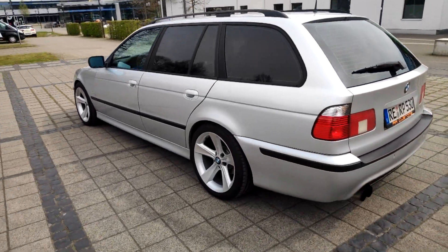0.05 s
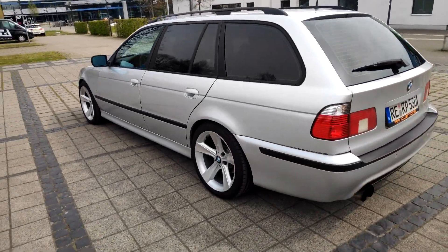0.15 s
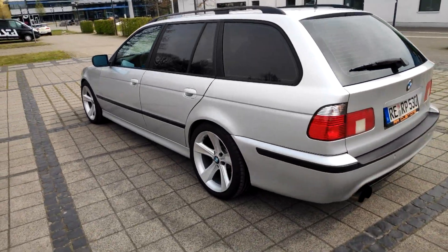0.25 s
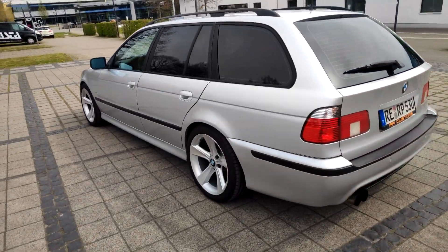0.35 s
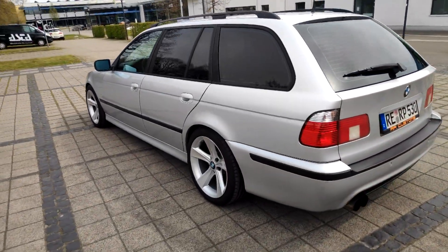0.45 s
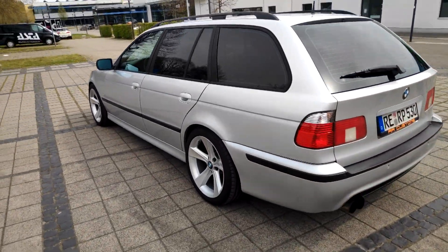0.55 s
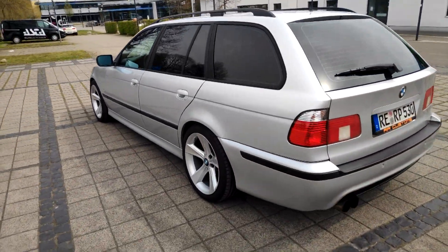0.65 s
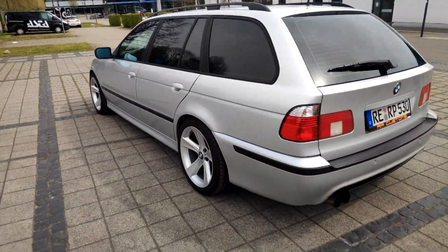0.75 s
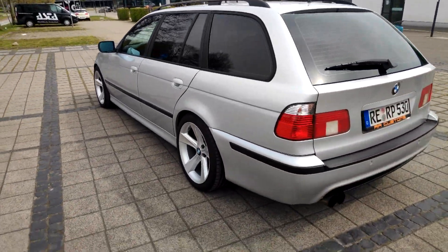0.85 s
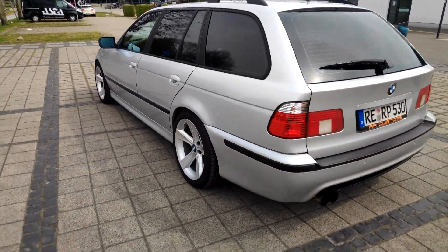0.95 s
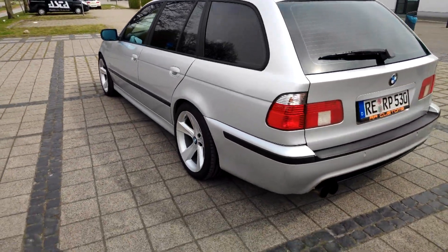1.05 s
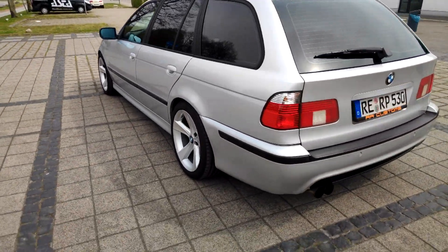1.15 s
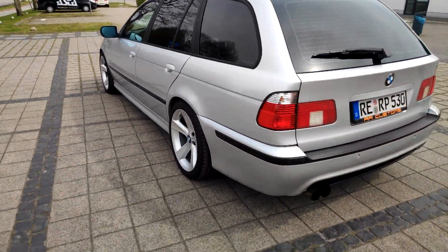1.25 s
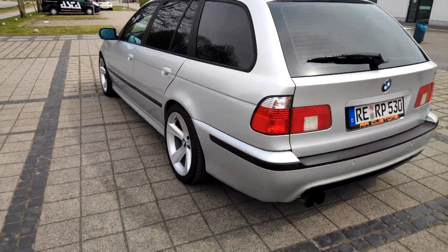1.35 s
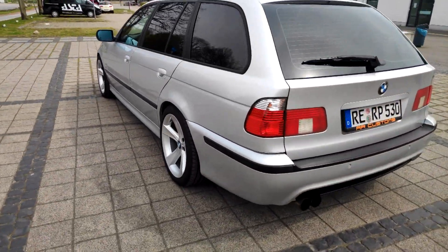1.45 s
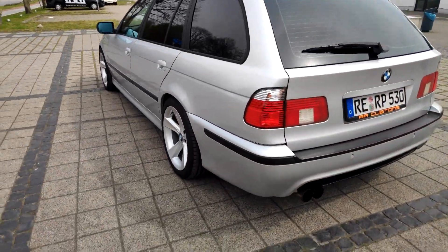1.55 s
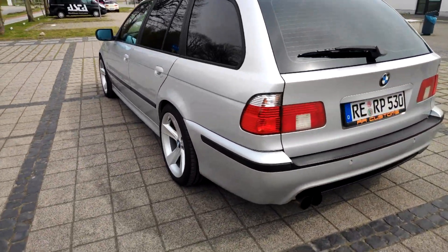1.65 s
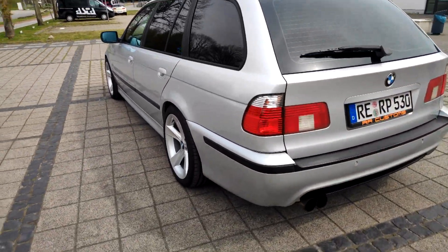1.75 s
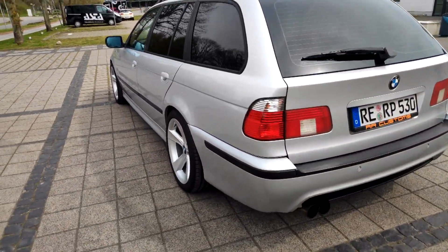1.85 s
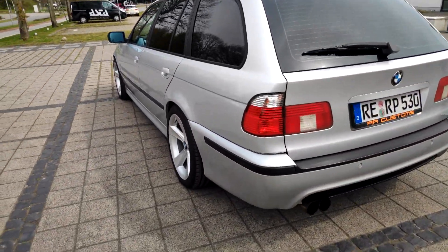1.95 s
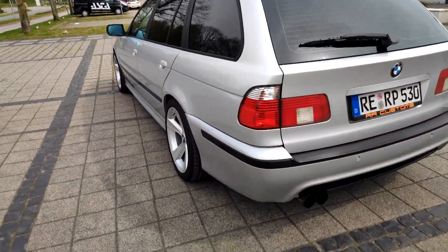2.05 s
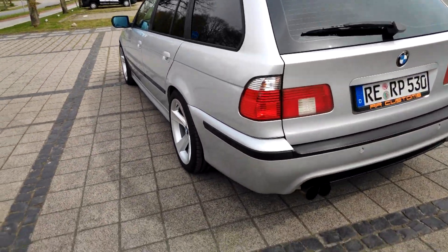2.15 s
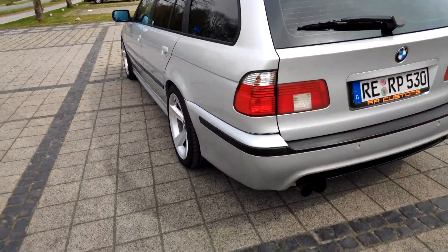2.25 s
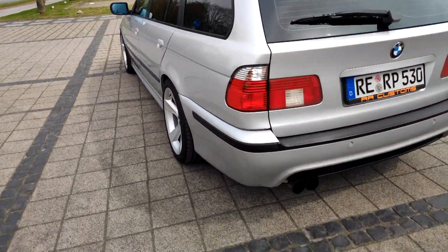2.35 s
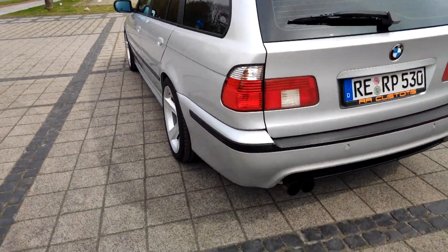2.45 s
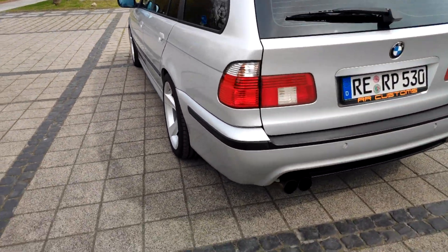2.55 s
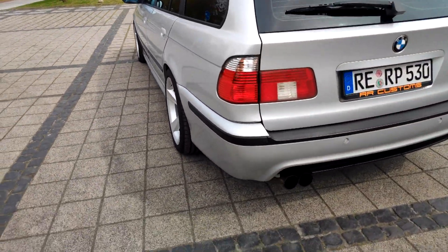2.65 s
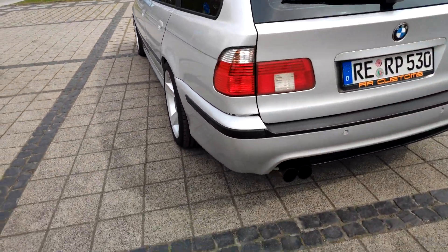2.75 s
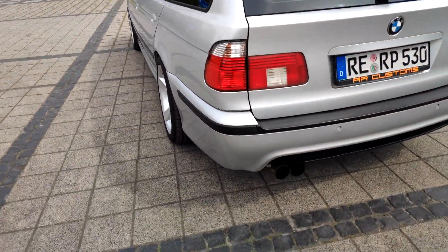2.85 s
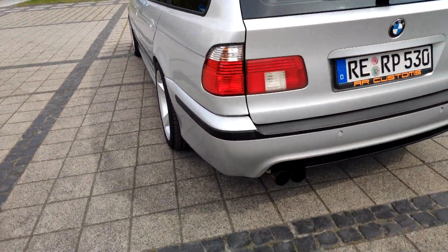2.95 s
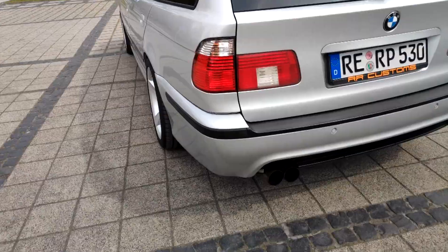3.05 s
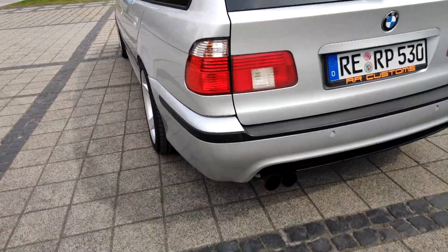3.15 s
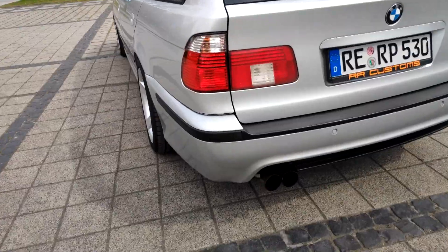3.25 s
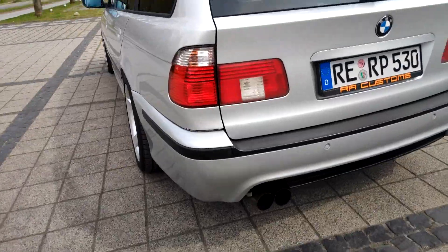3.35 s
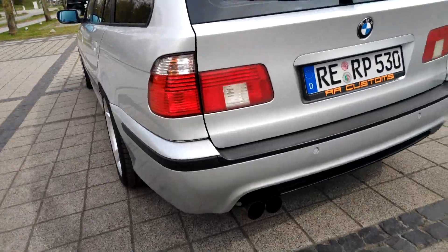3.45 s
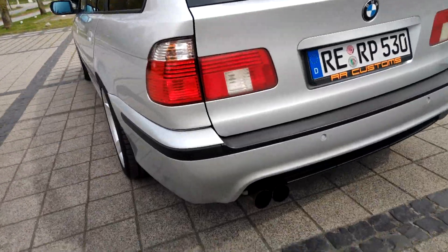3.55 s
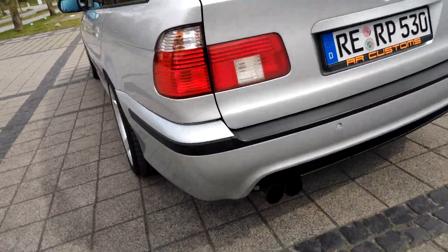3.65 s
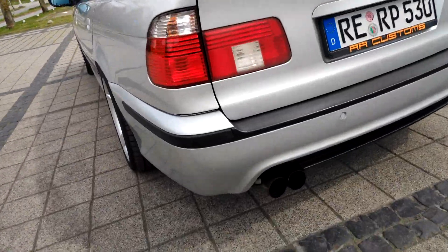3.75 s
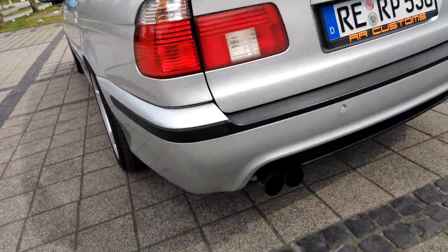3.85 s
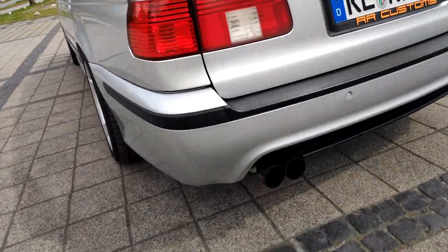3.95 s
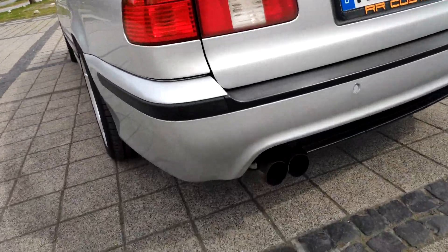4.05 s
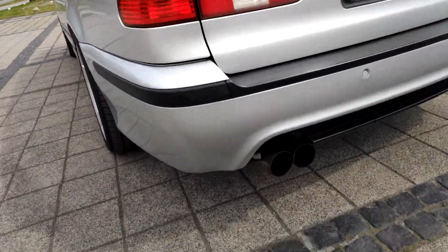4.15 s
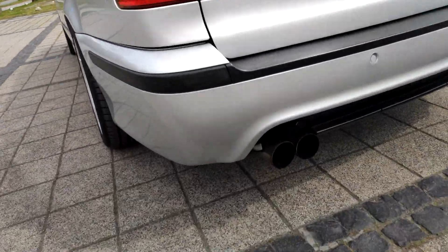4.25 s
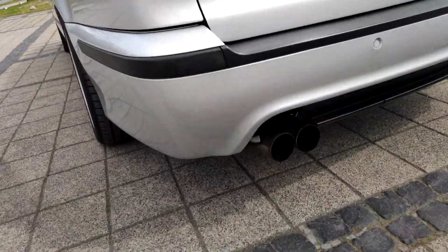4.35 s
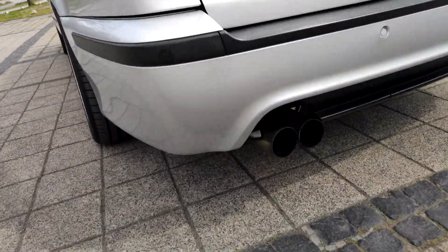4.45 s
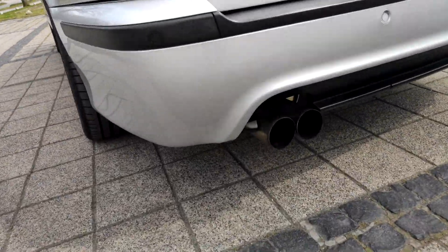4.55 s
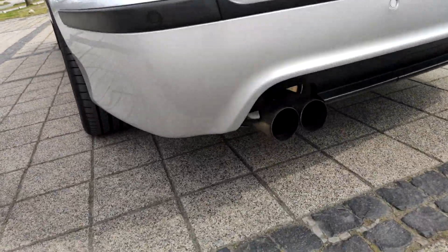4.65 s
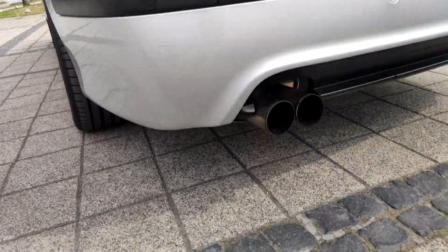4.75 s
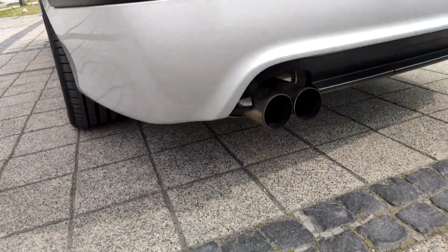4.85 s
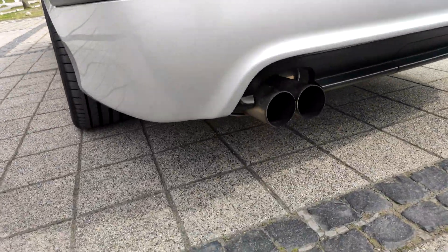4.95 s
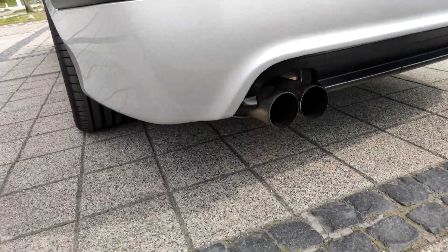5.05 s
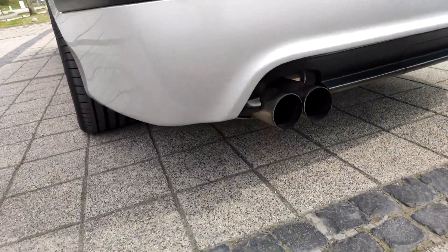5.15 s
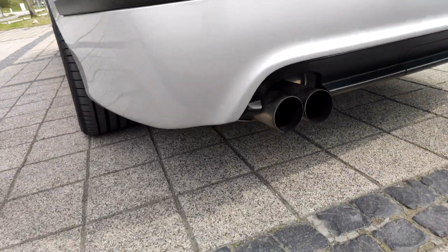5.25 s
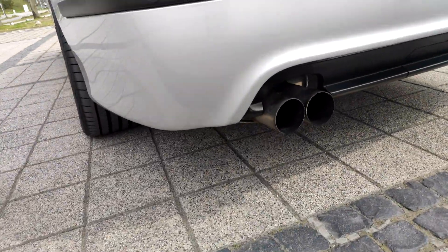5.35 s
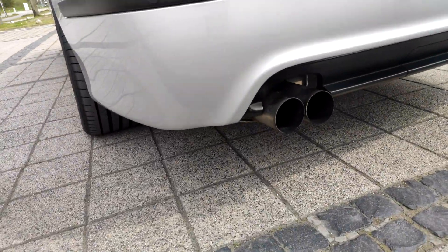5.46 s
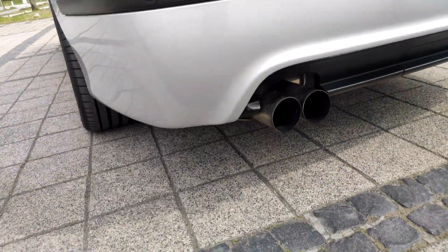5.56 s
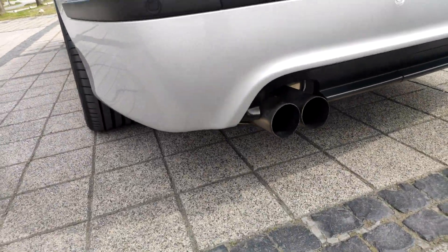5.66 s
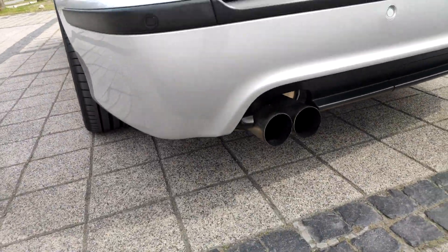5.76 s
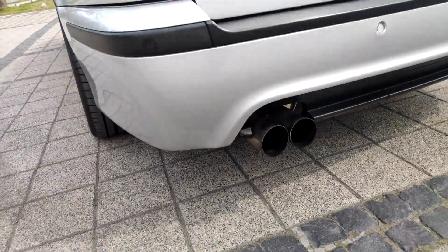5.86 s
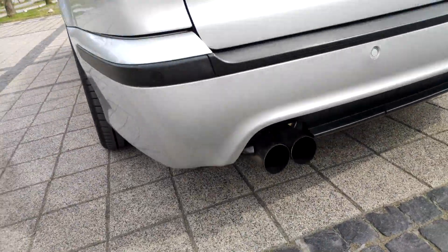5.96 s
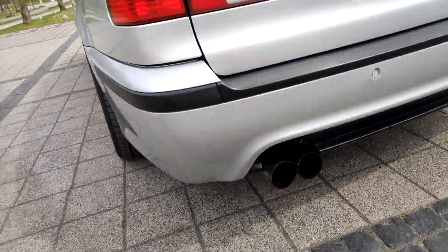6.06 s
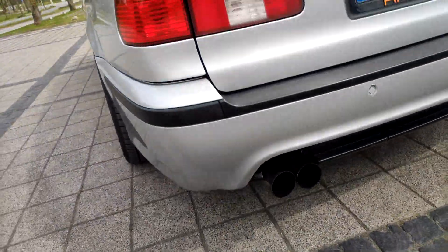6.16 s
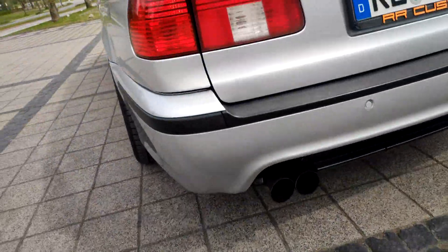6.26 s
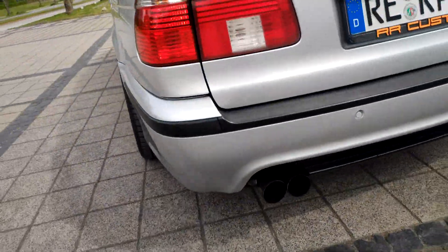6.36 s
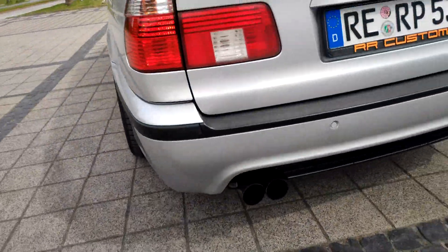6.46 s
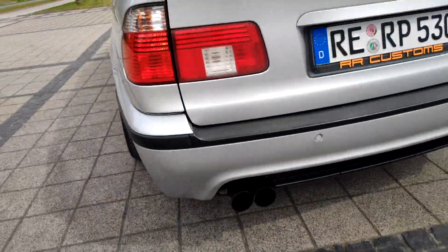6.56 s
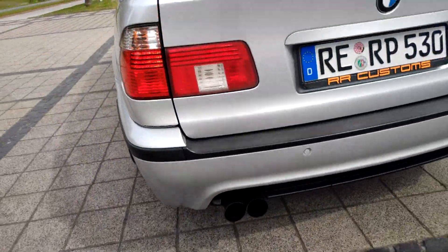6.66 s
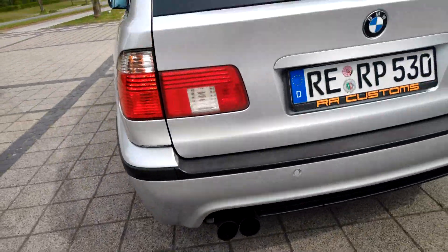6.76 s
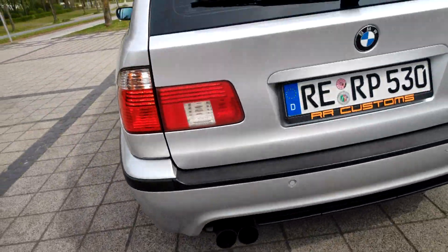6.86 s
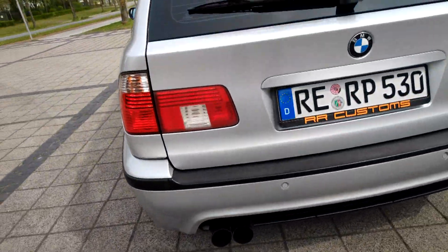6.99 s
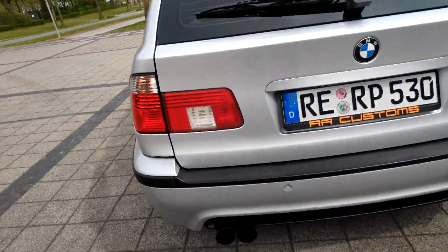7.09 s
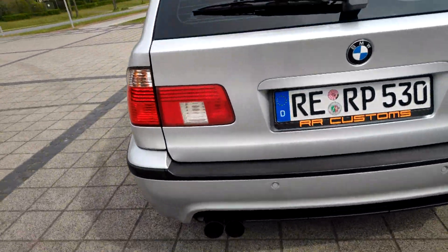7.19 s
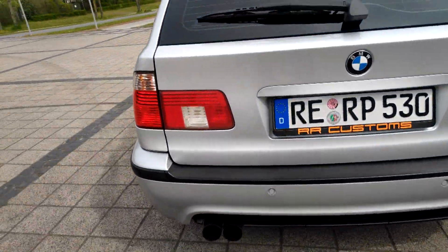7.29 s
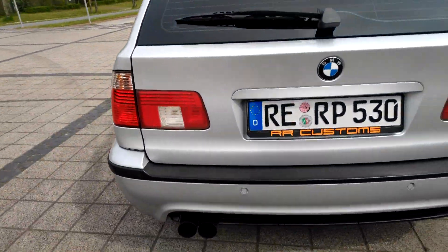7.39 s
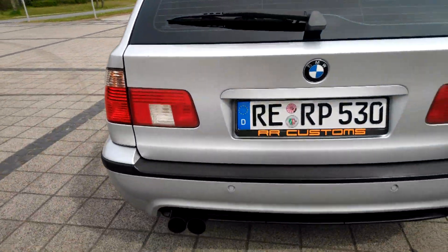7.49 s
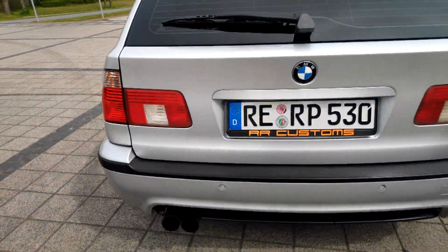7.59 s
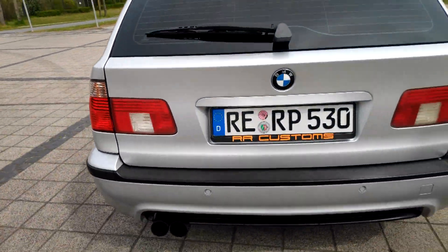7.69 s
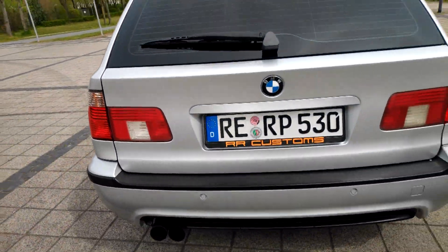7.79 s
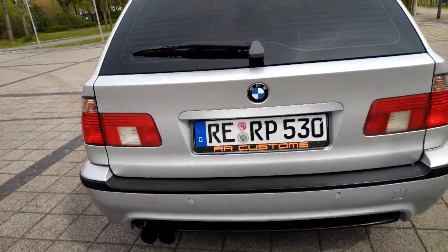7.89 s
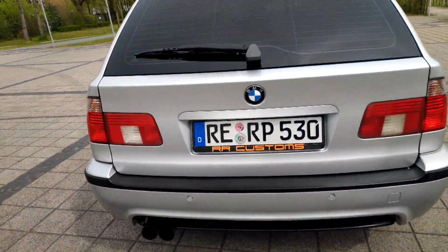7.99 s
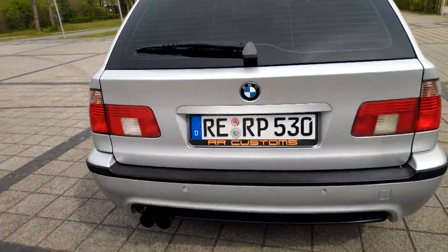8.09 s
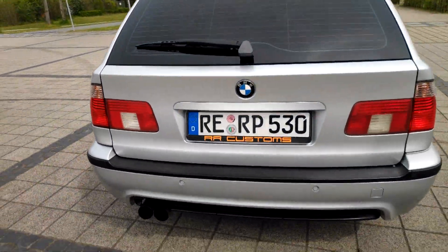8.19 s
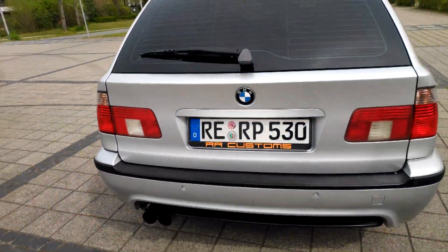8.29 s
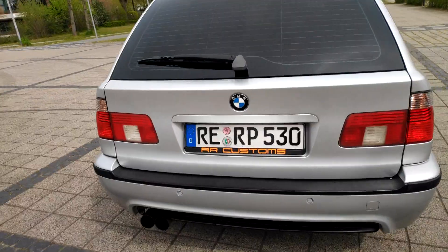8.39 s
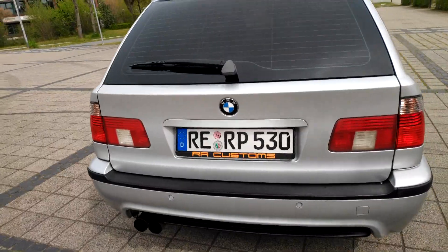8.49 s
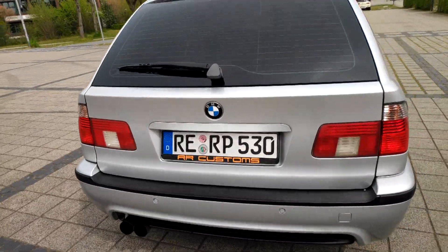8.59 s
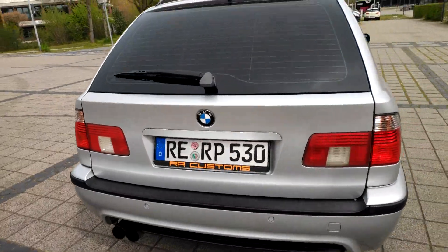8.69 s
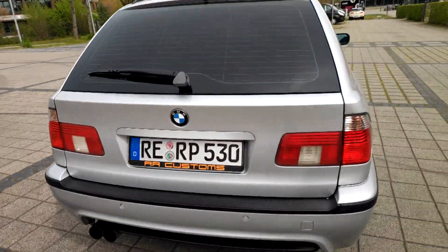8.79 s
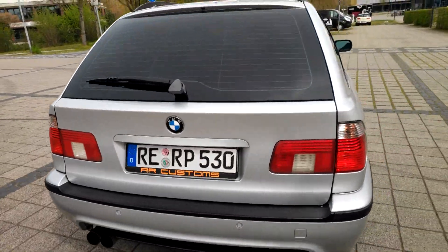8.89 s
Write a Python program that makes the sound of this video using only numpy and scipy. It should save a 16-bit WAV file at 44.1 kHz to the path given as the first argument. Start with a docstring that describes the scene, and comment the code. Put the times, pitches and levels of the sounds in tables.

```python
"""A throbbing, clattering idle: a six-cylinder diesel car on a paved lot, heard from a hand-held
microphone that walks along its side to the tailpipes and away. Each firing drives a pressure pulse out
of the exhaust, which booms louder when near. The body screens the engine's clatter, and metal parts ring
at set places in every engine cycle. Gusts buffet and overload the microphone halfway, smaller ones
come at the end, shoes scuff and the hand ticks on the housing."""
import sys
import numpy as np
from scipy.fft import rfft, irfft, next_fast_len
from scipy.io import wavfile
from scipy.ndimage import map_coordinates

SR = 44100
rng = np.random.default_rng(int(sys.argv[2]) if len(sys.argv) > 2 else 0)


def output_pcm(signal):
    """Save a mono or channel-first signal as 16-bit PCM at the path in sys.argv[1].

    Samples are clipped to [-1, 1] before scaling.
    """
    pcm = np.clip(np.atleast_2d(signal).T, -1, 1) * 32767
    wavfile.write(sys.argv[1], SR, np.round(pcm).astype(np.int16))


N = 393813
TIME = np.arange(N) / SR
FFT_SIZE = next_fast_len(N + SR // 2, True)
FREQ = np.fft.rfftfreq(FFT_SIZE, 1 / SR)

# engine speed at idle: time_s, firing_rate_hz
IDLE_SPEED = [(0, 37.5), (4, 37.52), (5, 37.48), (6, 37.44), (8.93, 37.44)]
CYLINDERS, FIRING_HZ = 6, IDLE_SPEED[0][1]


def exhaust(firing, boom_db, scatter_db=1.3, jitter_firings=0.0025, lope_db=1.5):
    """Periodic forcing: firings make a harmonic boom; unequal puffs ring the silencer as a throb."""
    # harmonics of the pressure swing: firing_rate_multiple, level_db
    harmonics = [(1, -4), (2, 3.5), (3, -4)]
    # each cylinder's puff: lag_firings, level_db
    cylinder_puffs = [(0.092, 2.5), (0.043, -2), (0.092, 1.5), (0.0794, 5), (-.3, -5.5), (0.08, -4.5)]
    # the silencer's low resonance: frequency_hz, gain_db
    silencer = [(20, -7.5), (62, -1.5), (135, -8), (168, -16), (700, -78.5)]
    # turbulent gas in each puff: frequency_hz, density_db
    burble_spectrum = [(80, -12.5), (180, -1), (260, 4.5), (330, -9.5), (420, -15), (520, -22.5),
                       (900, -46)]
    swing = -sum(amp(db) * np.sin(2 * np.pi * round(k) * (firing - .625) + 0.39) for k, db in harmonics)
    lope = lope_db * np.cos(4 * np.pi * (firing - 1.9) / CYLINDERS)  # every third firing is stronger
    number = np.arange(int(firing[-1]))
    lag, puff_db = np.array(cylinder_puffs)[number % CYLINDERS].T
    timing, strength = rng.standard_normal((len(number), 2)).T
    puff_samples = np.interp(number + 0.087 + lag + jitter_firings * timing, firing, np.arange(N))
    puffs = np.bincount(puff_samples.astype(int), amp(puff_db + scatter_db * strength), N)
    throb = filtered(puffs - puffs.mean(), minimum_phase(spectrum(silencer)))
    burble = (1 + 0.5 * np.cos(2 * np.pi * (firing - .7))) * noise(spectrum(burble_spectrum))
    boom = amp(boom_db + lope + 0.27 * wobble(25)) * swing
    # close to the pipes the boom grows faster than the rest
    return boom + amp(36 + 0.71 * boom_db) * throb + amp(-46 + 0.11 * boom_db) * burble


def pipe_resonance(firing, near_db):
    """Air-column resonance: the unequal puffs ring the pipe in the same rhythm in every cycle."""
    # pipe modes: place_firings, half_length_firings, pitch_hz, level_db
    modes = [(.85, .45, 205.1, -2.5), (.8, .6, 256.1, -9.5), (2.5, .35, 255, -10.5), (3.25, 0.7, 203, 0),
             (4.05, 0.51, 265, -12), (5.3, .55, 195, -7)]
    tones = sum(amp(db) * cyclic_tone(firing, place, length, hz, drift_rad=0.15)
                for place, length, hz, db in modes)
    return amp(-31.5 + 0.44 * near_db) * tones


def gas_rush(firing, gas_db, distance_m, pulsing=0.12, colour_rad_per_m=3.02):
    """Jet noise: gas leaves the tailpipes, harder at each firing; its fine colour shifts with place."""
    # the rush of gas: frequency_hz, density_db
    jet_spectrum = [(250, -25.5), (420, -13.5), (620, -8), (740, -11), (860, -8), (1050, -15.5),
                    (1250, -16.5), (1380, -12.5), (1550, -14.5), (2300, -17.5), (2900, -16.5),
                    (3650, -18.5), (4000, -22.5), (6000, -27), (7300, -30.5), (9650, -40), (15500, -52.5)]
    one, other = (noise(spectrum(jet_spectrum) * cavity_ripple(110)) for _ in range(2))
    blend = colour_rad_per_m * distance_m
    rush = np.cos(blend) * one + np.sin(blend) * other
    pulse = 1 + pulsing * np.cos(2 * np.pi * (firing - .5))
    return amp(gas_db + wobble(14)) * pulse * rush


def engine(firing, clatter_db, hiss_db, bounce_s, decay_firings=0.38, rise_firings=0.16):
    """Impact excitation: combustion knocks ring the block over a whirr, a hiss and a thin whine."""
    # the block's clatter: frequency_hz, density_db
    block_spectrum = [(200, -1), (320, 5.5), (480, -10), (620, -7.5), (1100, -12.5), (1300, -9),
                      (1850, -14.5), (2300, -20.5), (3200, -37), (6000, -72)]
    # the engine's hiss: frequency_hz, density_db
    hiss_spectrum = [(1500, -31), (2600, -10.5), (3000, -3), (3400, -1.5), (3900, -6), (5200, -5),
                     (6300, -8), (9000, -15.5), (12000, -26), (15500, -27.5)]
    number, since = np.divmod(firing + .93, 1)
    strength = amp(1 + 1.1 * rng.standard_normal(int(firing[-1]) + 2))[number.astype(int)]
    knocks = strength * np.exp(-since / decay_firings) * (1 - np.exp(-since / rise_firings))
    block = spectrum(block_spectrum) * cavity_ripple(92.8)
    bright_noise = noise(block * FREQ ** 2 / (FREQ ** 2 + 450 ** 2))  # high-pass at 450 Hz
    # each cylinder rings the block in its own way, the same in every cycle
    ring = map_coordinates(bright_noise, [(number % CYLINDERS + since) * SR / FIRING_HZ])
    whirr = noise(block)
    clatter = amp(clatter_db) * unit_rms(1.73 * knocks * ring + whirr)
    hiss = amp(hiss_db) * unit_rms((1 + 0.24 * knocks) * noise(spectrum(hiss_spectrum)))
    direct = clatter + hiss
    paving_reflection = 0.14 * map_coordinates(direct, [(TIME - bounce_s) * SR])
    whine = amp(-77 + 2 * wobble(2.1)) * noise(resonance(6335, width_hz=25))
    return direct + paving_reflection + whine


def injectors(firing, hiss_db, place_firings=.25, half_length_firings=0.23, scatter_db=2.0):
    """Impact resonance: the injectors rattle briefly at each firing, screened like the engine's hiss."""
    # injector modes: centre_hz, width_hz, level_db
    modes = [(1710, 260, -1), (3530, 300, -3.5), (4440, 220, -7.5)]
    number, since = np.divmod(firing - place_firings + .5, 1)
    strength = amp(scatter_db * rng.standard_normal(int(firing[-1]) + 3))[number.astype(int)]
    ticks = strength * np.exp(-((since - .5) / half_length_firings) ** 2)
    ring = noise(sum(amp(db) * resonance(hz, width) ** 2 for hz, width, db in modes))
    return amp(hiss_db - 3) * unit_rms(ticks * ring)


def metal_ringing(firing, bay_db):
    """Forced vibration: each metal part swells at its own place in the engine cycle."""
    # metal modes: place_firings, half_length_firings, pitch_hz, level_db, frontness (0 tail, 1 engine)
    modes = [(.55, .45, 846, 3, .05), (.95, 0.67, 785, 1, 0.14), (3.7, .6, 857, 2, .08),
             (4.69, 0.34, 825, 2.5, .02), (5.2, .8, 853, -1.5, .02), (1.6, 1.5, 610, -9, 0.068),
             (5.5, .5, 945, 3.5, 0.58), (4.25, .26, 2036, 8, .64), (2.3, 0.45, 1320, 1, 0.35),
             (5.25, .28, 1320, 2.5, 0.39), (.4, .4, 1760, 3, .9), (2.3, 0.2, 1550, 1, .75),
             (4.8, .25, 3490, -1.5, 1)]
    # ringing under the tail: time_s, level_db
    tail_levels = [(0, -49.5), (2.2, -55), (4.2, -51.5), (5.3, -48.5), (6.2, -54.5), (6.55, -49.5),
                   (6.95, -59), (7.6, -45.5), (8.15, -47.5), (8.93, -49.5)]
    tail_db, = curves(tail_levels)
    ringing = np.zeros(N)
    for place, length, hz, db, frontness in modes:
        gain = amp(db + frontness * bay_db + (1 - frontness) * tail_db)
        ringing += gain * cyclic_tone(firing, place, length, hz, drift_rad=.42)
    return ringing


def wind(near_db):
    """Turbulent pressure: breeze and gusts rumble on the microphone port, brighter when strong."""
    # gusts that rise and fall alike: peak_s, half_length_s, buffet_db, rumble_db
    gusts = np.array([(3.378, 0.23, -27.5, -24), (3.663, 0.077, -18, -18.5), (3.868, 0.093, -17.5, -31),
                      (4.17, 0.26, -12.9, -23.5), (4.411, 0.082, -11.5, -29.5), (4.594, 0.11, -19, -19),
                      (4.945, 0.19, -22.5, -27), (8.48, 0.14, -25, -17.5), (8.684, 0.042, -22, -19.5),
                      (8.808, 0.025, -24, -12)])
    # a gust's slow pressure: frequency_hz, density_db
    rumble_spectrum = [(5, -12.5), (14, -0.5), (30, 0.5), (65, -6), (130, -16), (260, -43), (800, -90.5)]
    # buffeting at the port: frequency_hz, density_db
    buffet_spectrum = [(8, -2.5), (25, 1), (55, 4), (160, 0.5), (230, -8), (310, -22), (450, -30),
                       (700, -47), (4000, -89.5)]
    # small fast eddies: frequency_hz, density_db
    eddy_spectrum = [(100, -4.5), (260, 7), (370, -3), (520, -12), (750, -26), (1500, -39.5), (4000, -70)]
    breeze = amp(-36 + 1.15 * near_db)  # stronger near the car's tail
    gust_db = 20 * np.log10(np.hypot(breeze, swells(gusts[:, :3]))) + 2.5 * wobble(45)
    rumble = np.hypot(amp(3.5) * breeze, swells(gusts[:, [0, 1, 3]])) * noise(spectrum(rumble_spectrum))
    buffet = amp(gust_db) * noise(spectrum(buffet_spectrum))
    eddies = amp(-3 + 1.448 * gust_db) * noise(spectrum(eddy_spectrum))
    return rumble + buffet + eddies


def wind_pops(port_hz=380, port_decay_s=0.0023, port_db=-10, push_peak_s=0.014, rise_s=0.00044):
    """Overload: the microphone pops and crackles in the wind, each a step, a knock and a slow push."""
    # overload pops and crackles: start_s, level_db, decay_s, push_db, instant_share
    pops = [(3.141, -16.5, 0.003, -31, .38), (3.499, -17, 0.004, -11, .38), (4.2472, -5.5, .022, -8, .27),
            (4.336, -13.5, 0.0018, -30, 0.027), (4.373, -16.5, .002, -30, .02),
            (4.406, -11.5, .003, -18.5, .02), (5.288, -14, .0047, -4.5, 0.42),
            (5.559, -22, .0036, -29, .08), (5.711, -11, .014, -3.5, .38)]
    track, t = np.zeros(N), TIME[:SR // 8]
    for start_s, db, decay_s, push_db, instant_share in pops:
        step = np.exp(-t / decay_s) * (1 - (1 - instant_share) * np.exp(-t / rise_s))
        knock = amp(port_db) * np.sin(2 * np.pi * port_hz * t) * np.exp(-t / port_decay_s)
        push = t / push_peak_s * np.exp(1 - t / push_peak_s)
        add(track, start_s, amp(db) * (step + knock) + amp(push_db) * push)
    return track


def handling(knock_t60_s=0.0071):
    """Structure-borne sound: a finger knocks the microphone housing and scrapes briefly."""
    # finger contacts: start_s, level_db, pitch_hz, scrape_relative_db, scrape_t60_s
    taps = [(2.391, -44.5, 895, 4, 0.027), (2.879, -10, 626, -17, 0.0059),
            (2.884, -23.5, 704, -11.5, 0.023), (2.889, -20, 507, -24.5, 0.0075),
            (3.336, -41, 600, 0.5, .02), (8.409, -38, 445, 5.5, 0.023), (8.418, -33.5, 450, -1.5, 0.053),
            (8.625, -19.5, 1290, -25, 0.0066)]
    # colour of a scrape: frequency_hz, gain_db
    scrape_spectrum = [(300, -10.5), (1500, 1.5), (5000, -1.5), (10000, -5.5), (16000, -10.5)]
    knocks, scrapes, t = np.zeros(N), np.zeros(N), TIME[:SR // 10]
    for start_s, db, hz, scrape_db, t60_s in taps:
        add(knocks, start_s, amp(db - 60 * t / knock_t60_s) * np.sin(2 * np.pi * hz * t))
        add(scrapes, start_s, amp(db + scrape_db - 60 * t / t60_s) * rng.standard_normal(len(t)))
    return knocks + filtered(scrapes, minimum_phase(spectrum(scrape_spectrum)))


def shoes_and_sleeves(grit_db=3.5, half_width_octaves=.6):
    """Friction noise: soles brush the paving and sleeves rustle, each time with its own colour."""
    # scuffs and rustles: peak_s, half_length_s, level_db, centre_hz
    scuffs = [(.02, 0.12, -57.5, 6000), (1.552, .11, -59.5, 6100), (2.63, .1, -71.5, 7950),
              (3.12, .14, -65, 7430), (3.41, 0.23, -60.5, 5800), (3.48, .15, -67.5, 13000),
              (4.06, 0.017, -48, 2600), (6.385, 0.032, -58, 4800), (6.965, .022, -68, 11030),
              (8.02, .06, -72.5, 10000), (8.375, .025, -61, 10040)]
    rubs = np.zeros(N)
    for peak_s, length_s, db, hz in scuffs:
        colour = 1 / (1 + (np.log2((FREQ + 1) / hz) / half_width_octaves) ** 4)
        rubs += swells([(peak_s, length_s, db)]) * noise(colour)
    return amp(grit_db * wobble(150)) * rubs


def cyclic_tone(firing, place, half_length, hz, drift_rad):
    """Amplitude modulation: a tone swells at one place in every engine cycle, nearly alike each time."""
    offset = (firing - place + CYLINDERS / 2) % CYLINDERS - CYLINDERS / 2
    tone = np.sqrt(2) * np.sin(2 * np.pi * hz * offset / FIRING_HZ + drift_rad * wobble(10))
    return amp(wobble(10)) * np.exp(-(offset / half_length) ** 2) * tone


def cavity_ripple(spacing_hz, depth_db=1.5):
    """The many small fixed resonances of a cavity, as a gain."""
    knots = rng.standard_normal(SR // 20)
    return amp(depth_db * map_coordinates(knots, [FREQ / spacing_hz]))


def resonance(hz, width_hz):
    """A narrow Lorentzian peak, as a gain."""
    return 1 / (1 + ((FREQ - hz) / (.78 * width_hz)) ** 2)


def spectrum(points):
    """Gain at every frequency from (Hz, dB) points on a log axis."""
    hz, db = np.transpose(points)
    return amp(np.interp(np.log(FREQ + 1), np.log(hz + 1), db))


def minimum_phase(gain):
    """Causality: the response with this gain that rings only after its cause."""
    cepstrum = irfft(np.log(gain + 1e-6), FFT_SIZE)
    cepstrum[1:FFT_SIZE // 2] *= 2
    cepstrum[FFT_SIZE // 2:] = 0
    return np.exp(rfft(cepstrum))


def filtered(x, response):
    """x through a frequency response."""
    return irfft(rfft(x, FFT_SIZE) * response, FFT_SIZE)[:N]


def noise(gain):
    """Coloured noise of rms 1."""
    return unit_rms(filtered(rng.standard_normal(N), gain))


def wobble(knots_per_s):
    """A smooth random curve."""
    coarse = TIME[::32]
    knots = rng.standard_normal(int(N * knots_per_s / SR) + 4)
    return np.interp(TIME, coarse, map_coordinates(knots, [coarse * knots_per_s]))


def swells(rows):
    """Gaussian bumps from (peak_s, half_length_s, level_db) rows, summed in power."""
    return np.sqrt(sum((amp(db) * np.exp(-((TIME - s) / length) ** 2)) ** 2 for s, length, db in rows))


def passed(time_s, fade_s):
    """Goes smoothly from 0 to 1 around time_s."""
    return .5 + .5 * np.tanh((TIME - time_s) / fade_s)


def curves(rows):
    """One value per sample for each column after the time."""
    times, *columns = np.transpose(rows)
    return [np.interp(TIME, times, column) for column in columns]


def add(track, start_s, sound):
    """Mix a sound into a track."""
    part = track[round(start_s * SR):]
    part[:len(sound)] += sound[:len(part)]


def amp(db):
    """Decibels to gain."""
    return 10 ** (np.asarray(db) / 20)


def unit_rms(x):
    """Scale to rms 1."""
    return x / np.sqrt(np.mean(x ** 2) + 1e-20)


def scene():
    """Spreading and screening set the car's levels along the walk; the firings set its rhythm."""
    # the microphone's walk: time_s, tailpipe_distance_m
    walk = [(0, 2.15), (3, 1.32), (4.2, 0.78), (4.7, 0.7), (5.7, 0.61), (6.4, 0.96), (8, 1.4), (8.93, 1.76)]
    firing = .175 + np.cumsum(curves(IDLE_SPEED)[0]) / SR  # running count of firings
    distance_m, = curves(walk)
    near_db = -20 * np.log10(distance_m)  # spherical spreading, 0 dB at 1 m
    arch_hidden = passed(1.69, fade_s=0.19)  # the front wheel arch goes out of sight
    behind = passed(3.144, fade_s=0.1)  # the microphone rounds the rear corner
    clatter_db = -45 - behind * (8 + 0.7 * near_db)  # the body screens more close to the bumper
    hiss_db = -55 - 7 * arch_hidden - 11.5 * behind
    gas_db = -49.5 + 0.4 * near_db - 13 * (1 - behind)  # gas noise beams backwards
    bounce_s = 0.00107 - .00028 * distance_m  # extra delay of the path off the paving
    front = engine(firing, clatter_db, hiss_db, bounce_s) + injectors(firing, hiss_db)
    tail = exhaust(firing, boom_db=-17.5 + near_db) + pipe_resonance(firing, near_db)
    tail += gas_rush(firing, gas_db, distance_m)
    car = front + tail + metal_ringing(firing, bay_db=hiss_db)
    return (car + wind(near_db) + wind_pops() + handling() + shoes_and_sleeves())[None]


def record(dry, low_cut_hz=5, ceiling=.71, top_hz=15830):
    """Saturation and band limits: the microphone blocks steady pressure; its input flattens peaks."""
    coupled = filtered(dry[0], 1j * FREQ / (low_cut_hz + 1j * FREQ))
    clipped = coupled / (1 + np.abs(coupled / ceiling) ** 50) ** (1 / 50)
    return filtered(clipped, FREQ < top_hz)[None]


dry = scene()
out = record(dry)
output_pcm(out)
```